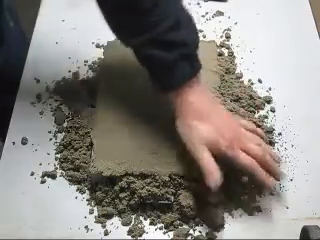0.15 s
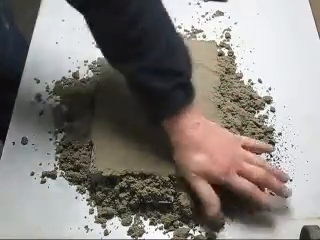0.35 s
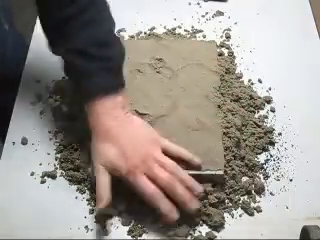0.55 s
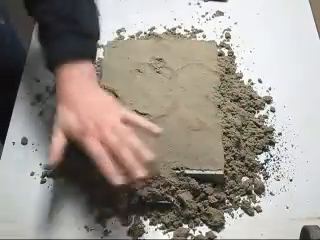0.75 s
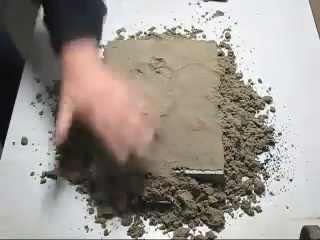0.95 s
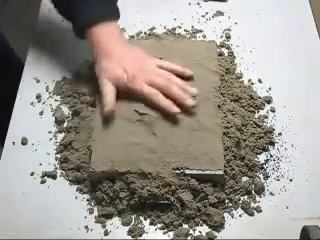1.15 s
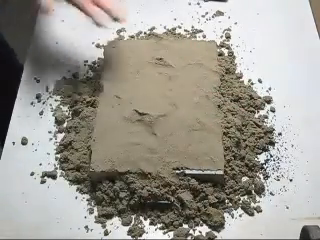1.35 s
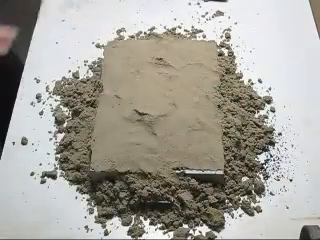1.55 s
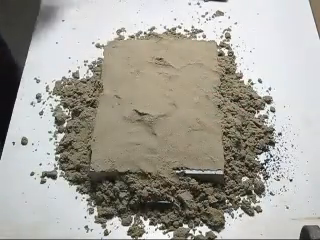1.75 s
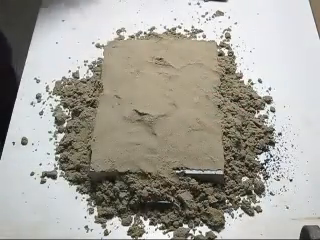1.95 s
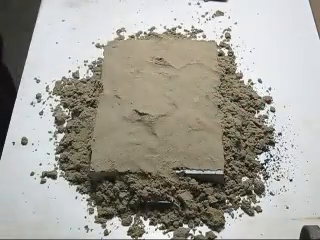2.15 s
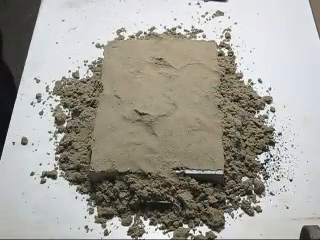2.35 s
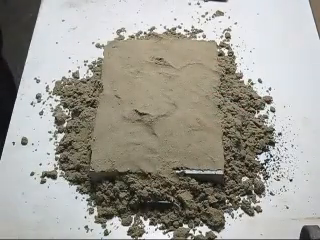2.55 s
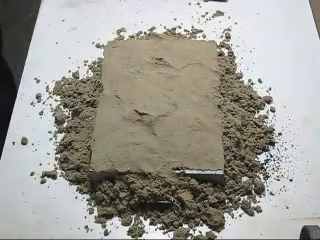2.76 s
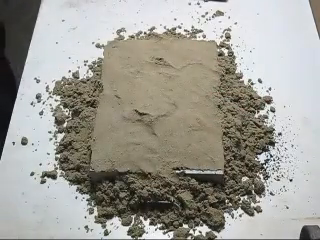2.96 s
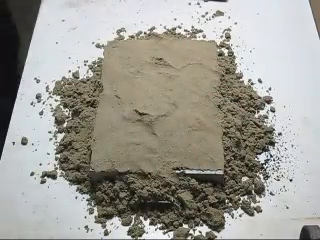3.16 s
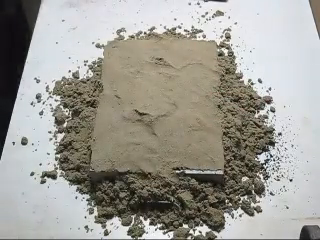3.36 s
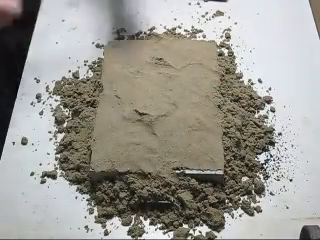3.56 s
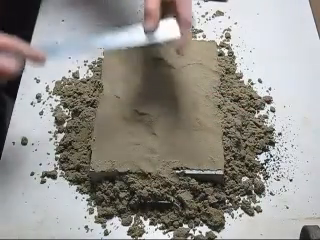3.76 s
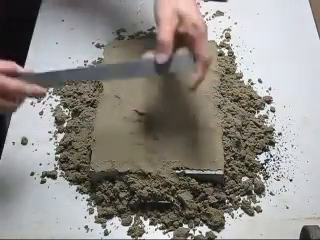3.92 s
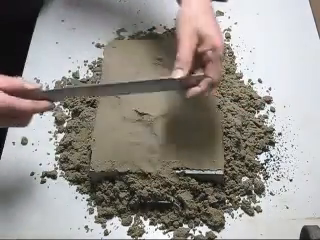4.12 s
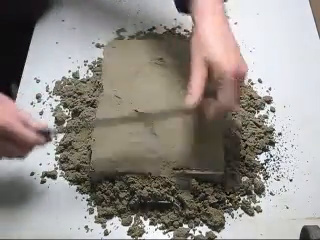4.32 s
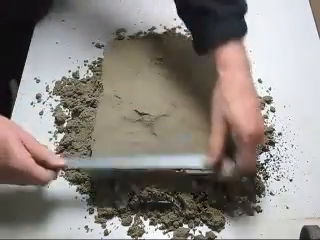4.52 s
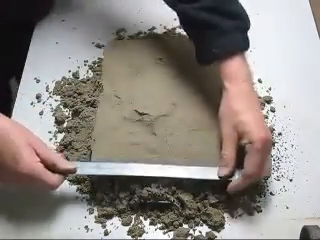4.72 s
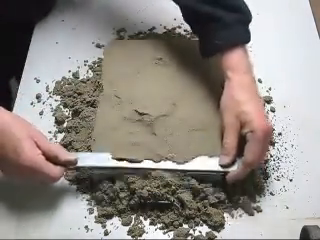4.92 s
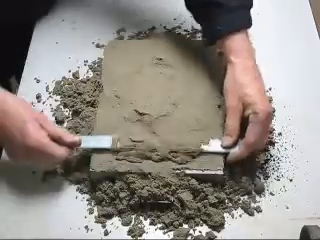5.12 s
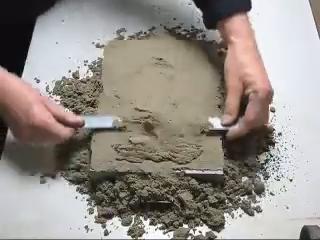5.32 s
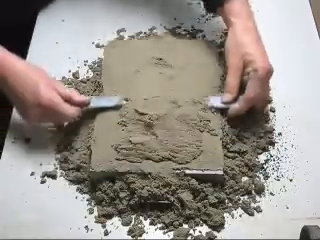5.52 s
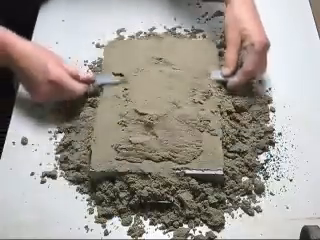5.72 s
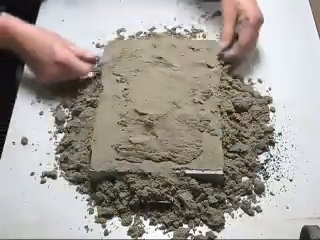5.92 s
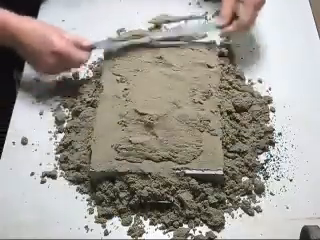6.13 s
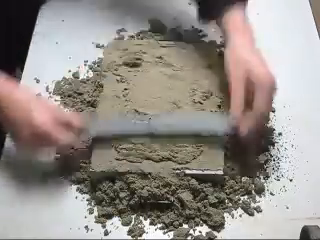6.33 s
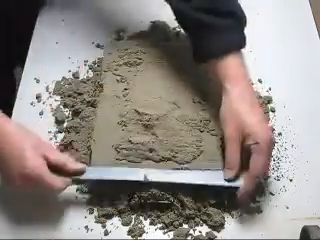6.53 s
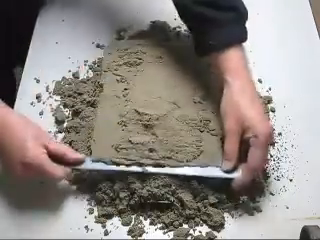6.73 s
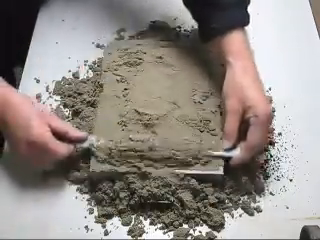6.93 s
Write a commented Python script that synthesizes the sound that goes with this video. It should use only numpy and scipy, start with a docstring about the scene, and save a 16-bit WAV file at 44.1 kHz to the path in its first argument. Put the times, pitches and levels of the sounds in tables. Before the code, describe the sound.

Steady airy hiss fills a workshop. A hand pats damp sand in a box five times, quick and even, dull at first, then louder and slappier with scattering crumbs. The arm draws back with soft rubbing, tools knock on the bench, sleeves swish, and a steel edge scrapes faintly across the sand in two strokes. One close, slightly dull microphone; short room tail.

```python
"""Over a steady workshop hiss, five pats on moulding sand, a few knocks, then dry scraping strokes.
A hand pats the sand into a small box on a table: decaying box and skin modes, noise puffs, scattered crumbs.
A steel straight edge is picked up with knocks (bench modes) and drawn across the sand (coloured grains).
Hiss, palm, sleeves and table shudder are shaped noise; the ticks are tiny computed pulses.
A sharp tick makes the recorder's gain control duck the hiss, which then swells back."""
import sys
import numpy as np
from scipy import signal
from scipy.fft import rfft, irfft, next_fast_len
from scipy.io import wavfile
from scipy.ndimage import uniform_filter1d, minimum_filter1d

SR = 44100
rng = np.random.default_rng(int(sys.argv[2]) if len(sys.argv) > 2 else 0)


def to_wav(sig):
    """Store sig (one row per channel, or 1-D mono) as 16-bit WAV at the path in sys.argv[1].

    Samples outside -1..1 are clipped; the rate is SR.
    """
    pcm = np.clip(np.atleast_2d(sig), -1, 1) * 32767
    pcm = np.round(pcm).astype(np.int16)
    wavfile.write(sys.argv[1], SR, pcm.T)  # frames by channels


N = 312228
TIME = np.arange(N) / SR

# Drift of the workshop hiss. Each row: time in seconds, level in dB.
HISS_LEVEL = [(0, -32.5), (3.3, -32.5), (4.5, -31), (5.6, -31.5), (6.4, -31.5), (7.08, -32.5)]
# Colour of the hiss. Each row: frequency in Hz, relative density in dB per Hz.
HISS_COLOUR = [(25, -19.5), (90, -14), (200, -10.5), (350, -8), (580, -1), (800, 1), (1150, -3.5),
               (1400, -2.5), (1800, -1), (2300, -5.5), (3000, -7.5), (4000, -15), (5500, -20),
               (9000, -32.5)]

# Hand landing on the sand. Each row: start in seconds, level in dB, corner pitch of the palm contact in Hz,
# skin smack in dB, roll from fingers to palm in seconds, table shudder in dB.
PATS = [(0.002, -19, 270, -48, 0.014, -22), (0.283, -12, 416, -30, 0.008, -25.5),
        (0.576, -14, 390, -28, 0.0085, -31.5), (0.8478, -11, 520, -16.5, 0.0076, -31),
        (1.1125, -7.5, 650, -11, 0.0137, -50)]
# Fingers, palm, heel and settling in every pat. Each row: delay in rolls, thud in dB, smack in dB,
# hardness as a factor on the corner pitch.
TOUCHES = [(0, -4.5, -1.5, 1.86), (0.998, 0, -13, 0.96), (2.75, -5, -22, 1.06), (5.8, -16, -26, .9)]
# Filled box on the table top. Each row: frequency in Hz, level in dB, t60 in seconds.
BOX_MODES = [(102.4, -9, 0.25), (119, -8.5, 0.079), (169.3, -14, 0.29), (210, -21, 0.049), (268, -9, 0.076),
             (325, -5, 0.057), (385, -3.5, 0.02), (479, -1, 0.047), (577, -2.5, 0.021), (716, -1, .04),
             (823, -3.5, 0.1), (1150, -10, 0.027)]
# Slap of skin on damp sand. Each row: frequency in Hz, level in dB, t60 in seconds.
SKIN_MODES = [(945, -22, 0.0057), (1320, 1.5, 0.01), (1694, 0, 0.018), (2230, 5.5, 0.0081),
              (3200, -13, .006)]
# Crumbs flung off by a pat. Each row: frequency in Hz, relative density in dB per Hz.
CRUMB_COLOUR = [(800, -10), (3000, 7), (5500, -2), (7000, -9), (9000, -24)]
TOUCH_SCATTER = 0.109  # share by which the roll is uneven
CRUSH_TOP_HZ = 660  # damp sand gives way dully, however hard the touch
PUSH_HZ, PUSH_PEAK_S = 124, 0.0046  # shove by the weight of the hand, as strong as the pat
PUSH_MOST_DB = -11  # packed sand gives no further
PAT_WET_DB = -14.5

# Palm on the sand. Each row: frequency in Hz, relative density in dB per Hz.
RUB_COLOUR = [(60, -8.5), (100, -4.5), (150, 0.5), (200, -7.5), (420, -5.5), (600, -8.5), (830, -5),
              (1100, -19.5), (2500, -57.5)]
RUB_DB, RUB_END_S, RUB_FADE_DB_PER_S = -35.5, 1.47, 80  # palm brushes until it lifts off
SLIDE_DB, SLIDE_PEAK_S = -41, 0.24  # extra push after each pat
SHIFT_DB, SHIFT_END_S, SHIFT_FADE_DB_PER_S = -46, 2.62, 15.5  # arm drawing back along the table

# Low shudder of the table. Each row: frequency in Hz, relative density in dB per Hz.
SHUDDER_COLOUR = [(15, -14.5), (28, -1), (40, 17), (52, -14), (75, -31.5), (150, -58)]
SHUDDER_PEAK_S = 0.036  # after a pat
LEAN_DB, LEAN_END_S, LEAN_FADE_DB_PER_S, TREMBLE_FLOOR_DB = -44.5, 1.5, 12, -65.5

# Sleeve swishes. Each row: time of the peak in seconds, level in dB, rise in seconds.
SWISHES = [(0.436, -34.5, 0.0076), (1.16, -35, 0.026), (2.223, -33, 0.056), (2.665, -30, 0.022),
           (3.791, -32.5, 0.062), (4.46, -38, 0.046), (6.555, -33.5, 0.015)]
# Sleeve cloth. Each row: frequency in Hz, relative density in dB per Hz.
SWISH_COLOUR = [(100, -7), (230, 0.5), (500, -11), (2000, 1.5), (3500, -4.5), (6000, -12), (9000, -27)]
SWISH_FALL = 1.9  # fall time over rise time

# Tools knocking on the bench. Each row: start in seconds, level in dB, corner pitch of the contact in Hz.
KNOCKS = [(2.238, -26, 2500), (2.572, -14, 250), (2.7356, -16.5, 1200), (2.7836, -17.5, 1800),
          (2.816, -29, 800), (3.347, -28, 500), (3.776, -25, 300)]
# Bench with the tools on it. Each row: frequency in Hz, level in dB, t60 in seconds.
BENCH_MODES = [(240, -10, 0.059), (585, 0, 0.02), (705, -7.5, 0.093), (887, 1, 0.015), (1206, 5.5, 0.017),
               (1990, -14, .02)]
REBOUND_S, REBOUND_LOSS_DB, REBOUND_HZ = 0.016, 11, 750  # spacing, loss per rebound, highest corner pitch

# Sharp ticks. Each row: start in seconds, gain of the spike in dB, of the snap in dB, of the bump in dB.
TICKS = [(2.2448, 10, -6, -17.5), (6.579, -3.5, -16, -25), (6.691, -45, -38, -31)]

# Strokes of the straight edge. Each row: start in seconds, end in seconds, level in dB.
STROKES = [(4.746, 6.12, -45.5), (6.773, 7.203, -42.5)]
# Sand shaved by the edge. Each row: frequency in Hz, relative density in dB per Hz.
SAND_COLOUR = [(200, -8.5), (700, -3), (1800, 6.5), (3200, -6), (5500, -16.5), (9000, -21)]
STROKE_EASE_S = 0.11  # the edge bites in and runs out gradually

ROOM_T60_S, WALL_CUT_HZ = 0.73, 1950

# The recorder's own noise. Each row: frequency in Hz, relative density in dB per Hz.
SELF_NOISE_COLOUR = [(40, -7.5), (130, 0), (400, 4.5), (2500, 5), (5500, -1), (7500, -8.5), (9000, -28)]
LIMIT_DB, MIC_TOP_HZ, CUTOFF_HZ = -4.5, 9050, 15900


def from_db(db):
    """Decibels to gain."""
    return 10 ** (np.asarray(db) / 20)


def rms_one(x):
    """Scale to rms 1."""
    return x / np.sqrt(np.mean(x ** 2) + 1e-20)


def level(rows):
    """Gain over time from (s, dB) rows."""
    return from_db(np.interp(TIME, *np.transpose(rows)))


def cut(x, hz, kind="low", order=2):
    """Causal low- or high-pass."""
    sos = signal.butter(order, min(hz, .45 * SR), kind, fs=SR, output="sos")
    return signal.sosfilt(sos, x + 1e-18)


def colour(x, spectrum):
    """Filter by a (Hz, dB) curve, interpolated over log frequency; rms 1."""
    size = next_fast_len(N)
    hz, db = np.transpose(spectrum)
    bins_hz = np.maximum(np.arange(size // 2 + 1) * SR / size, 1)
    gain = from_db(np.interp(np.log(bins_hz), np.log(hz), db))
    return rms_one(irfft(rfft(x, size) * gain, size)[:N])


def noise(spectrum):
    """Smooth coloured noise; rms 1."""
    return colour(rng.standard_normal(N), spectrum)


def grains(per_s):
    """Tiny clicks of random size at random moments; rms 1."""
    return rms_one((rng.random(N) < per_s / SR) * rng.standard_normal(N))


def add(out, s, sound):
    """Mix a sound in at time s."""
    start = max(round(s * SR), 0)
    out[start:start + len(sound)] += sound[:N - start]


def waver(depth_db, rate_hz):
    """A gain that wanders at random."""
    return from_db(depth_db * noise([(1, 0), (rate_hz, 0), (4 * rate_hz, -30), (16 * rate_hz, -90)]))


def hold(db, end_s, fade_db_per_s):
    """A gain that holds until end_s and then fades steadily in dB."""
    return from_db(db - fade_db_per_s * np.maximum(TIME - end_s, 0))


def swell(s, peak_s):
    """A gain that rises from time s, reaches 1 after peak_s and dies away."""
    age = np.maximum(TIME - s, 0) / peak_s
    return np.square(age * np.exp(1 - age))


def strike(modes, contact_hz, spread_db):
    """One blow: a soft contact leaves high modes quiet; mode strengths scatter at random."""
    hz, db, t60 = np.transpose(modes)[:, :, None]
    t = TIME[:SR // 2]
    softness = np.hypot(1, np.square(hz / contact_hz))
    strength = from_db(db + spread_db * rng.standard_normal(hz.shape)) / softness
    sign = (-1) ** np.arange(len(hz))[:, None]
    return np.sum(sign * strength * from_db(-60 * t / t60) * np.sin(2 * np.pi * hz * t), axis=0)


def burst(top_hz, t60):
    """A dying puff of noise, starting at about rms 1."""
    t = TIME[:SR // 2]
    return rms_one(cut(rng.standard_normal(len(t)), top_hz, order=3)) * from_db(-60 * t / t60)


def room(x, wet_db, build_s):
    """Direct sound plus a dull, diffuse tail from the walls that builds up over build_s."""
    t = TIME[:SR]
    tail = cut(rng.standard_normal(SR), WALL_CUT_HZ) * from_db(-60 * t / ROOM_T60_S)
    tail = tail * (1 - np.exp(-t / build_s))
    tail = tail / np.sqrt(np.sum(tail ** 2))
    return x + from_db(wet_db) * signal.fftconvolve(x, tail)[:N]


def hiss(fizz_db):
    """A steady rush, as of an air line or burner: wavering noise with a fine fizz of grains on top."""
    fizz = cut(grains(per_s=980), 3800, "high")
    rush = colour(rng.standard_normal(N) + from_db(fizz_db) * fizz, HISS_COLOUR)
    return level(HISS_LEVEL) * waver(depth_db=0.55, rate_hz=16) * rush


def pats(crush_db, crumb_db, grit_db):
    """Skin smacks, the hand's weight shoves, damp sand gives way with a puff, box thuds, crumbs scatter."""
    thuds, smacks, scatter = np.zeros((3, N))
    t = TIME[:SR // 2]
    push = swell(0, PUSH_PEAK_S)[:len(t)] * np.sin(2 * np.pi * PUSH_HZ * t)
    crumb_fall = np.exp(-np.square((t - .055) / 0.056))
    for s, db, contact_hz, smack_db, roll_s, _ in PATS:
        add(thuds, s, from_db(min(db, PUSH_MOST_DB)) * push)
        for rolls, touch_db, touch_smack_db, hardness in TOUCHES:
            uneven = TOUCH_SCATTER * np.sqrt(abs(rolls)) * rng.uniform(-0.91, 1)
            lands_s = s + roll_s * (rolls + uneven)
            top_hz = hardness * contact_hz
            crush = from_db(crush_db) * burst(min(top_hz, CRUSH_TOP_HZ), t60=0.052)
            thud = strike(BOX_MODES, top_hz, spread_db=2.5) + crush
            grit = from_db(grit_db) * burst(top_hz=3500, t60=0.043)
            smack = strike(SKIN_MODES, contact_hz=4000, spread_db=5.0) + grit
            add(thuds, lands_s, from_db(db + touch_db) * thud)
            add(smacks, lands_s, from_db(smack_db + touch_smack_db) * smack)
        add(scatter, s, from_db(smack_db) * crumb_fall)  # harder smack, louder crumbs
    crumbs = from_db(crumb_db) * scatter * colour(grains(per_s=660), CRUMB_COLOUR)
    return room(cut(thuds, 99, "high", order=3) + smacks, PAT_WET_DB, build_s=0.0056) + crumbs


def rub():
    """The palm brushes over the sand, sliding on after each pat; then the arm draws back."""
    slides = from_db(SLIDE_DB) * sum(swell(s, SLIDE_PEAK_S) for s, *_ in PATS)
    palm = np.hypot(hold(RUB_DB, RUB_END_S, RUB_FADE_DB_PER_S), slides)
    arm = hold(SHIFT_DB, SHIFT_END_S, SHIFT_FADE_DB_PER_S)
    return np.hypot(palm, arm) * noise(RUB_COLOUR)


def shudder():
    """The table trembles under the leaning arm and shakes after each pat."""
    shakes = sum(from_db(shudder_db) * swell(s, SHUDDER_PEAK_S) for s, *_, shudder_db in PATS)
    tremble = hold(LEAN_DB, LEAN_END_S, LEAN_FADE_DB_PER_S) + from_db(TREMBLE_FLOOR_DB)
    return np.hypot(shakes, tremble) * noise(SHUDDER_COLOUR)


def sleeves():
    """Cloth swishes: noise that rises quickly and trails off."""
    gain = np.zeros(N)
    for s, db, rise_s in SWISHES:
        width_s = np.where(TIME < s, rise_s, SWISH_FALL * rise_s)
        gain += from_db(db) * np.exp(-np.square((TIME - s) / width_s))
    return gain * noise(SWISH_COLOUR)


def knocks(count=2):
    """Short knocks on the bench, a little way off, each with softer, duller, uneven rebounds."""
    out = np.zeros(N)
    for s, db, contact_hz in KNOCKS:
        add(out, s, from_db(db) * strike(BENCH_MODES, contact_hz, spread_db=2.5))
        for k in range(1, count + 1):
            rebound = strike(BENCH_MODES, min(contact_hz, REBOUND_HZ), spread_db=8.0)
            lands_s = s + REBOUND_S * (k + rng.uniform(-0.223, .25))
            add(out, lands_s, from_db(db - k * REBOUND_LOSS_DB) * rebound)
    return room(out, wet_db=-16, build_s=0.01)


def ticks(spike_s, snap_hz, snap_s, bump_s):
    """A needle-sharp spike, too high to hear, with a brief bright ring and a low bump that drains away."""
    out, t = np.zeros(N), TIME[:SR // 10]
    spike = t / spike_s * np.exp(1 - t / spike_s) * np.cos(np.pi * SR * t)  # carrier at SR / 2
    spike = cut(spike, CUTOFF_HZ, "high", order=6)
    snap = cut(np.exp(-t / snap_s) * np.sin(2 * np.pi * snap_hz * t), 5400, order=4)
    bump = -cut(np.exp(-t / bump_s), 1500)
    for s, spike_db, snap_db, bump_db in TICKS:
        add(out, s, from_db(spike_db) * spike + from_db(snap_db) * snap + from_db(bump_db) * bump)
    return out


def scrape():
    """Grains break loose unevenly under the steel edge, at an even pressure through each stroke."""
    pressure = np.zeros(N)
    for start_s, end_s, db in STROKES:
        ease = np.minimum(TIME - start_s, end_s - TIME) / STROKE_EASE_S
        pressure += from_db(db) * np.clip(ease, 0, 1)
    return pressure * waver(depth_db=3.0, rate_hz=23) * colour(grains(per_s=2900), SAND_COLOUR)


def scene():
    """Everything at the one microphone."""
    mix = hiss(fizz_db=-4)
    mix += pats(crush_db=0.5, crumb_db=-24.5, grit_db=-10.0)
    mix += rub() + shudder() + sleeves() + knocks()
    mix += ticks(spike_s=.00006, snap_hz=3100, snap_s=0.0004, bump_s=0.0028)
    return (mix + scrape())[None]


def gain_control(x, threshold_db, hold_s, release_s, attack_s):
    """Peaks over the threshold pull the gain down; it waits, then climbs back, slower near the top."""
    over_db = np.maximum(20 * np.log10(np.abs(x) + 1e-9) - threshold_db, 1e-9)
    half = int(hold_s * SR / 2)
    # largest excess within the last hold_s
    held_db = -minimum_filter1d(-over_db, 2 * half + 1, origin=half, mode="nearest")
    # the excess in dB decays exponentially
    duck_db = np.exp(np.maximum.accumulate(np.log(held_db) + TIME / release_s) - TIME / release_s)
    r = np.exp(-1 / (attack_s * SR))
    return x * from_db(-signal.lfilter([1 - r], [1, -r], duck_db))


def steep_low(x, hz, order):
    """Steep elliptic low-pass."""
    return signal.sosfilt(signal.ellip(order, .2, 80, hz, fs=SR, output="sos"), x)


def record(dry):
    """Gain control, self-noise, rounded peaks, narrow band, a faint thin top hiss and a small offset."""
    ceiling, offset = .46, -.007
    x = gain_control(dry[0], LIMIT_DB, hold_s=0.16, release_s=0.19, attack_s=0.0048)
    x = cut(x + from_db(-49) * noise(SELF_NOISE_COLOUR), 6680)
    x = steep_low(ceiling * np.tanh(x / ceiling), MIC_TOP_HZ, order=10)
    # the thin hiss rises and falls with the treble
    treble = np.sqrt(np.abs(uniform_filter1d(cut(x, 5000, "high") ** 2, size=SR // 150)))
    thin_hiss = treble * cut(rng.standard_normal(N), 13670, "high", order=24)
    x = x + from_db(-16.5) * thin_hiss
    return offset + steep_low(x, CUTOFF_HZ, order=12)[None]


dry = scene()
out = record(dry)
to_wav(out)
```